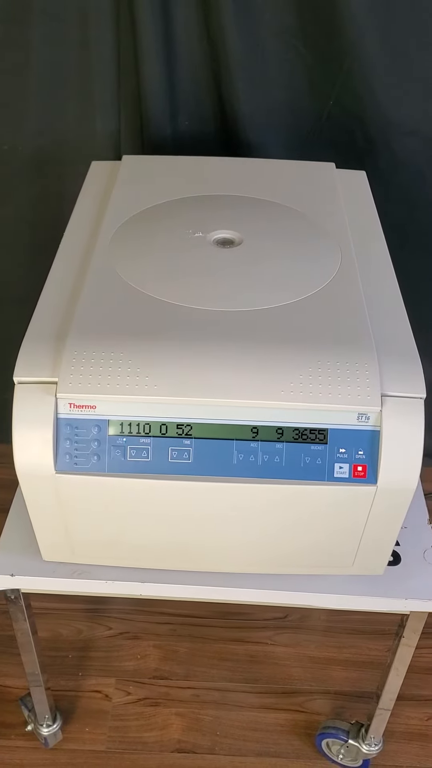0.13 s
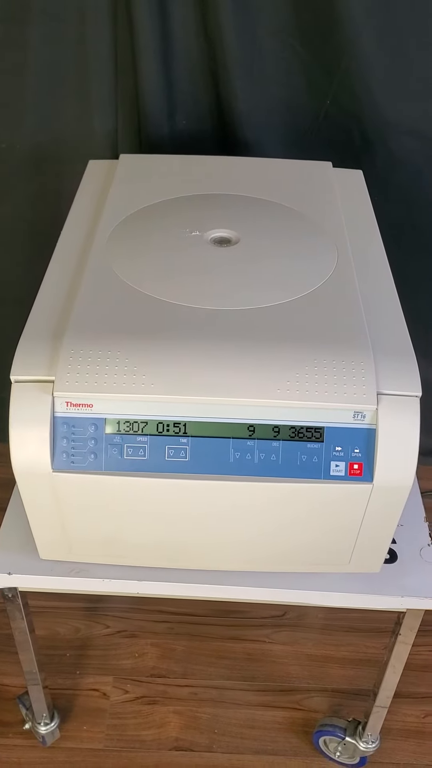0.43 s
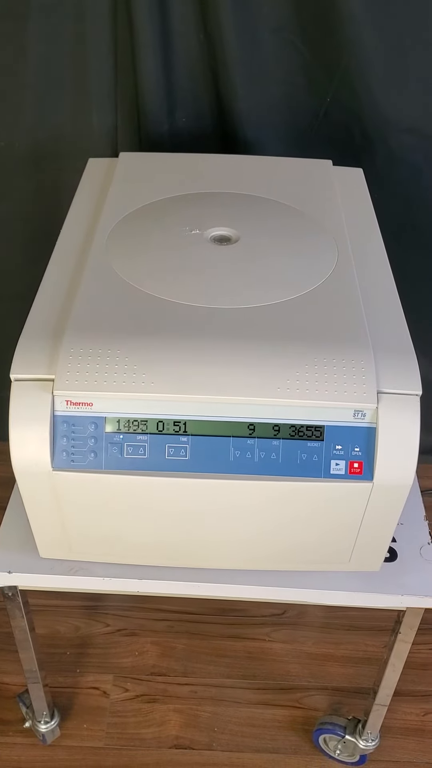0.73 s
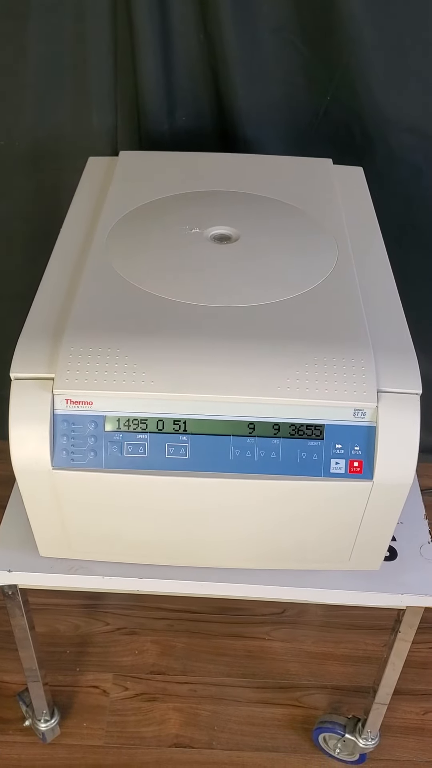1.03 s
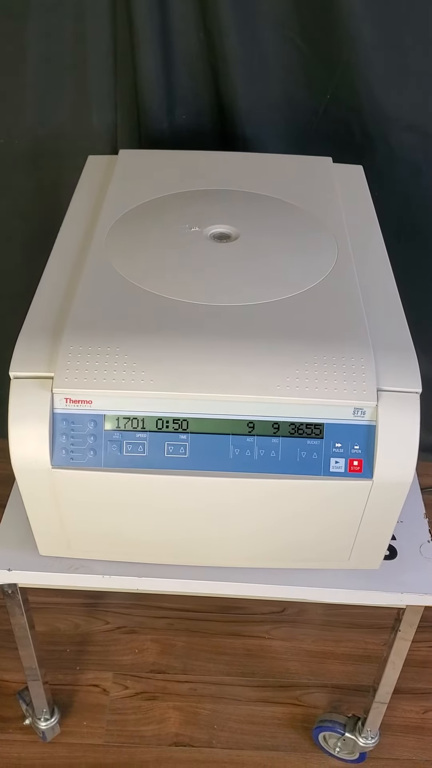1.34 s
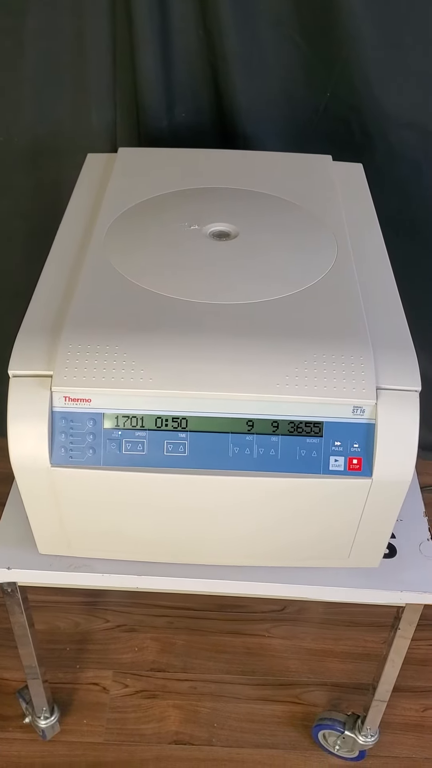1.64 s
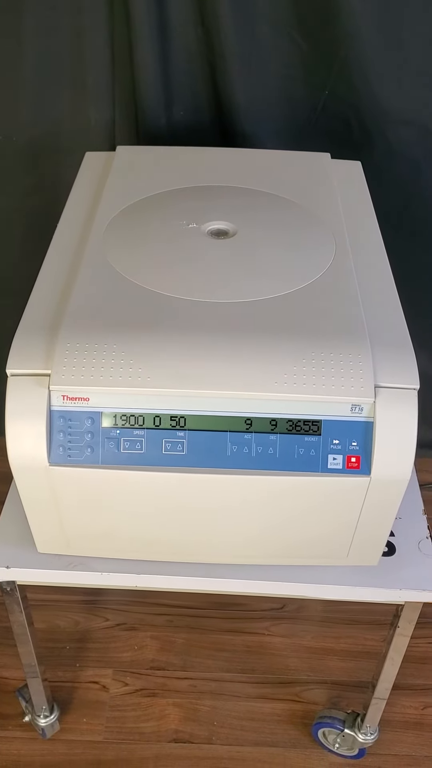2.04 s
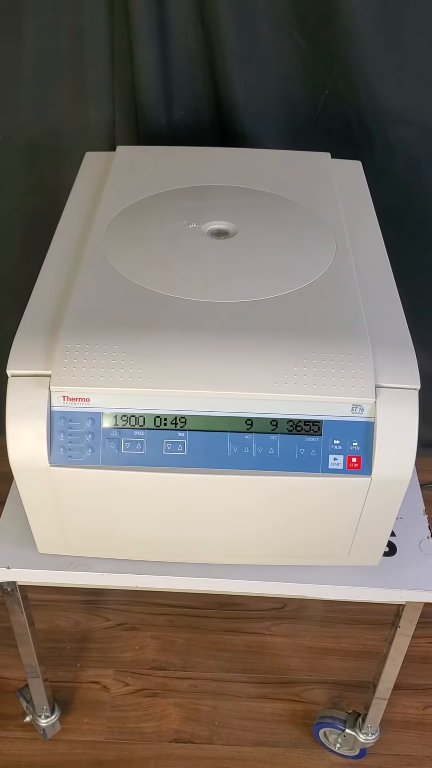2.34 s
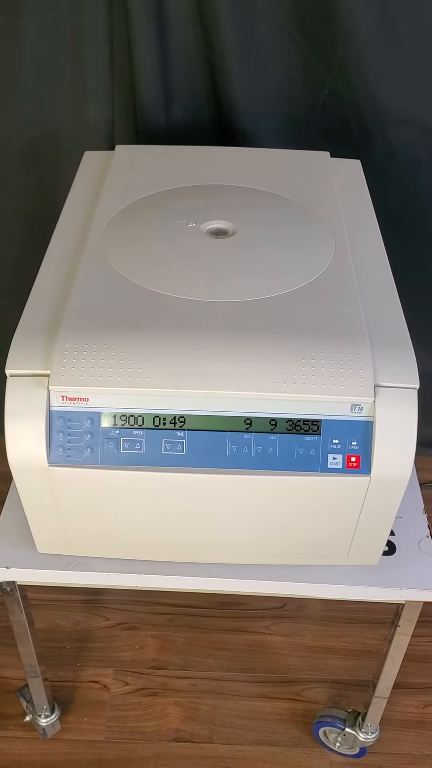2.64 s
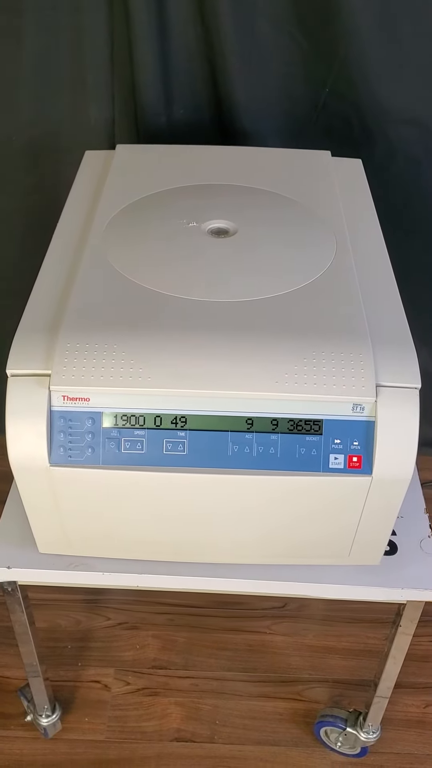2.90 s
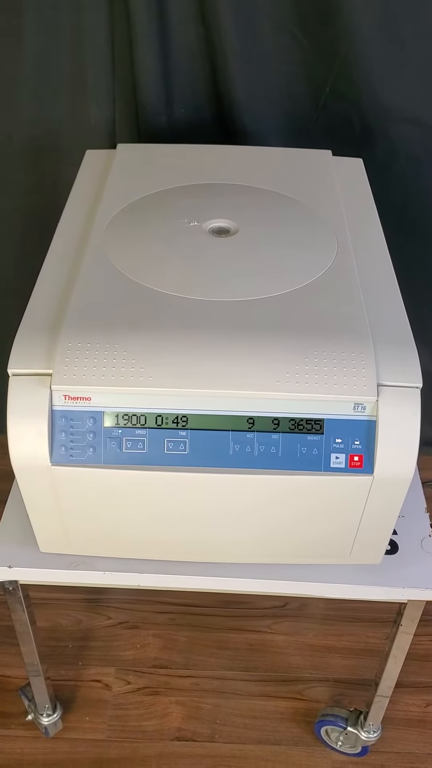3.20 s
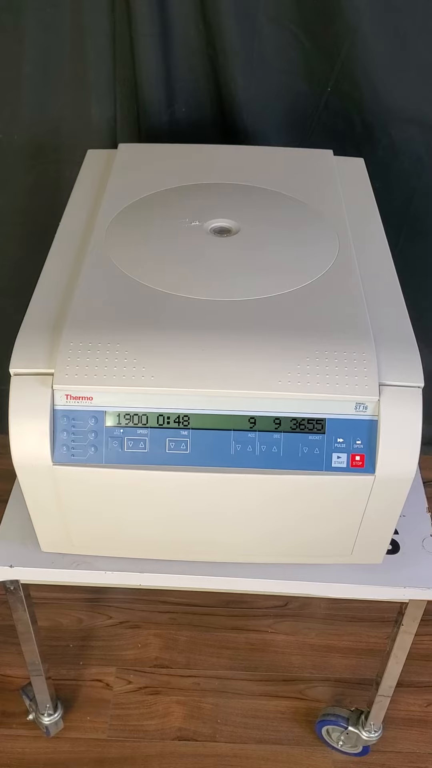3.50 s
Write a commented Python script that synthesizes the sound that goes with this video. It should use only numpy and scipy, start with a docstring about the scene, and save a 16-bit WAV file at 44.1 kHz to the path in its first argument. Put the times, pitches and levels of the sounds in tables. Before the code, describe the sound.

A bench centrifuge spins up in a quiet room, its hum and thin high whine rising smoothly, then sagging slightly; airflow and soft hiss surround it, with faint ticks late. Close stereo pickup, weaker and duller on the left.

```python
"""A bench centrifuge spins up in a quiet room: the hum climbs for 2.4 s, then eases back a little.
From the start, hum, octave and many thin whine orders glide through the fixed casing resonances,
over shaped noise for rumble, airflow, hiss and casing rattle. From 2.1 s, three soft ticks of treble
noise follow, each fainter. Two unlike channels: the left is weaker, nearly empty above 5.5 kHz,
with a faint steady hiss."""
import sys
import numpy as np
from scipy import signal
from scipy.io import wavfile
from scipy.ndimage import uniform_filter1d, map_coordinates

SR = 44100
rng = np.random.default_rng(int(sys.argv[2]) if len(sys.argv) > 2 else 0)


def generate_wav(signal):
    """Clip the signal to [-1, 1] and save it as 16-bit WAV at the path in sys.argv[1]."""
    frames = np.transpose(np.atleast_2d(signal))
    scaled = np.clip(frames, -1, 1) * 32767
    pcm = np.round(scaled).astype(np.int16)
    wavfile.write(sys.argv[1], SR, pcm)


def voltage_ratio(level):
    """Linear amplitude factor for a level in decibels (scalar or array-like)."""
    return 10 ** (np.asarray(level, float) / 20)


N = 161406

# Motor speed. Each row: time in seconds, hum pitch in Hz.
SPEED_HZ = [(0.0, 174.05), (0.203, 179.46), (0.407, 184.74), (0.61, 189.94), (0.813, 195.0),
            (1.017, 200.07), (1.22, 205.03), (1.423, 209.87), (1.627, 214.53), (1.83, 218.24),
            (2.033, 220.97), (2.237, 222.42), (2.44, 222.7), (2.643, 222.06), (2.847, 220.72),
            (3.05, 219.19), (3.253, 217.75), (3.457, 216.49), (3.66, 215.26)]
# Passage of hum and octave through casing and room. Each row: frequency in Hz, right channel rms in dB,
# left minus right in dB.
HUM_PATH_DB = [(175, -48, -6), (185, -34.5, -6), (189.5, -32, -7), (193, -35, -8), (201, -54, -5),
               (204.5, -42, -3), (209, -37, -3), (213.5, -38, -5), (216, -33, -8), (222, -28.5, -8.5),
               (350, -58, -10), (362, -48.5, -9), (372, -62, -10), (381, -46, -17), (398, -48, -13),
               (408, -43, -32), (414, -42, -11), (418.5, -45, -12), (424, -39, -9), (432, -40.5, -12),
               (441, -36, -9), (445.5, -38.5, -9)]
# Whine orders of the turning parts. Each row: multiple of the hum pitch, strength in dB before the casing.
WHINE_ORDERS_DB = [(8.14, -3), (8.33, 1), (9.365, -1), (11.325, -10), (12.355, -10), (12.65, -34),
                   (12.87, -20), (13.38, -17), (13.57, -24), (13.9, -21), (14.41, -20), (14.545, -31),
                   (14.64, -16), (14.93, -28), (15.35, -32), (15.445, -15), (15.54, -33), (15.865, -27),
                   (15.965, -26), (16.475, -12), (16.995, -19), (17.085, -22), (17.24, -26), (17.51, -16),
                   (18.205, -23), (18.43, -20), (18.63, -29), (19.425, -20), (19.625, -25), (19.66, -25),
                   (19.98, -28), (20.495, -17), (20.69, -27), (21.525, -28), (21.725, -28), (21.865, -24),
                   (22.055, -31), (22.24, -32), (22.365, -36), (22.56, -34), (22.67, -32), (22.75, -28),
                   (23.075, -31), (23.265, -32), (23.58, -30), (23.77, -31), (23.885, -36), (24.285, -32),
                   (24.6, -31), (24.795, -28), (25.11, -37), (25.52, -35), (25.66, -38), (25.83, -30),
                   (26.655, -26), (26.74, -32), (26.865, -34), (27.17, -33), (27.69, -35), (27.895, -32),
                   (28.75, -30)]
# Whine level as the load on the motor shifts. Each row: time in seconds, change in dB.
WHINE_LOAD_DB = [(0.0, -0.5), (0.5, 1.6), (1.0, 2), (1.5, 0.9), (2.0, -1), (2.5, 1), (3.0, 3), (3.66, 0)]
# Casing resonances. Each row: centre in Hz, width in Hz, peak gain in dB.
CASING_MODES = [(1692, 112, -62.7), (1980, 115, -65.6), (2550, 169, -46.7), (2709, 23, -44.6),
                (2811, 56, -28.5), (3046, 92, -39.0), (3142, 151, -37.1), (3447, 699, -61.1),
                (4139, 50, -44.2), (4232, 178, -43.6), (4426, 40, -44.8), (4585, 78, -46.9),
                (4780, 58, -37.7), (4926, 68, -29.0), (5026, 71, -36.5), (5191, 77, -47.4)]
# Left channel against right. Each row: frequency in Hz, gain in dB, phase lead in radians, likeness 0 to 1.
LEFT_CHANNEL = [(60, -8.5, 0, .99), (200, -7.5, 0, .97), (330, -8, 0, .88), (770, -7, -.1, .75),
                (1200, -8, -.3, .4), (1800, -7, -2.4, .35), (2800, -13, -1.9, .6), (4200, -13.5, -2, .3),
                (5100, -14, -1.5, .3), (5500, -36, 0, 0), (15000, -32, 0, 0)]
# Room rumble spectrum. Each row: frequency in Hz, relative density in dB per Hz.
RUMBLE_SHAPE_DB = [(20, -40), (30, -24), (42, -14.5), (55, -1), (70, -9.5), (85, 1), (100, -3.5),
                   (112, -16), (130, -21), (200, -16.5), (400, -45), (1500, -110)]
# Room rumble level. Each row: time in seconds, right channel level in dB.
RUMBLE_LEVEL_DB = [(0, -41.5), (.5, -46), (.7, -39), (2, -41), (3.3, -40.5), (3.66, -39)]
# Rotor airflow spectrum. Each row: frequency in Hz, relative density in dB per Hz.
AIR_SHAPE_DB = [(60, -10), (100, -1.5), (120, 3), (135, -2), (150, 9.5), (165, 1.5), (240, 0.5), (300, -3),
                (390, -6), (535, -6), (600, -9), (670, -4.5), (750, -4), (830, -10.5), (960, -5.5),
                (1100, -12), (1500, -10), (1850, -15), (3000, -15), (3800, -19.5), (4700, -23), (5500, -37),
                (9000, -93)]
# Rotor airflow level. Each row: time in seconds, right channel level in dB.
AIR_LEVEL_DB = [(0.0, -47), (0.61, -42.5), (0.77, -44), (2.08, -39.5), (3.54, -41), (3.66, -42)]
# Treble hiss spectrum. Each row: frequency in Hz, relative density in dB per Hz.
HISS_SHAPE_DB = [(4000, -5), (5300, 2.5), (7100, 2), (7230, 6), (7330, 2.5), (8000, -2.5), (8330, 0),
                 (8430, 6), (8550, -0.5), (9500, -1.5), (9900, 0), (11200, 2.5), (12500, -0.5),
                 (14300, -9.5), (15600, -22)]
# Treble hiss level. Each row: time in seconds, right channel level in dB before flicker.
HISS_LEVEL_DB = [(0, -68), (.3, -65.5), (.65, -64), (.78, -60), (1.1, -62.5), (1.5, -59.5), (2, -57),
                 (2.17, -59.5), (2.3, -58.5), (2.5, -57), (2.8, -59), (3.3, -60), (3.66, -59.5)]
# Soft ticks. Each row: start in seconds, peak level in dB, decay time constant in seconds.
TICK_EVENTS = [(2.122, -47.5, 0.028), (3.005, -55, .025), (3.58, -61, .015)]
# Tick spectrum. Each row: frequency in Hz, relative density in dB per Hz.
TICK_SHAPE_DB = [(3000, -14), (5500, -4), (7100, 0), (8000, -7), (10100, 0), (13500, -1), (15800, -22)]


def read(table, hz, axis=1):
    """One column of a table, interpolated over log frequency."""
    rows = np.array(table, float)
    return np.interp(np.log(hz + 1), np.log(rows[:, 0] + 1), rows[:, axis])


def curve(table, t_s):
    """A time table, interpolated linearly."""
    return np.interp(t_s, *np.transpose(table))


def evened(x):
    """Scales to rms 1."""
    return x / np.sqrt(np.mean(x ** 2) + 1e-20)


def drift(rate_hz):
    """Smooth random wander of rms 1, from 2 * rate_hz knots per second."""
    knots = rng.standard_normal(400)
    return evened(map_coordinates(knots, [np.arange(N) / SR * 2 * rate_hz], order=3))


def casing_gain(hz):
    """Fixed gain of the casing: steep resonances added in power."""
    power = 0
    for centre_hz, width_hz, db in CASING_MODES:
        offset = 2 * (hz - centre_hz) / width_hz
        power = power + (voltage_ratio(db) / (1 + offset ** 2 / 3) ** 1.5) ** 2
    return np.sqrt(power)


def stereo_noise(shape, level_db, patchy_db, size=1024):
    """Random short-time spectra, partly shared by the channels; the right one's level follows level_db."""
    frames, hz = 4 * N // size + 5, np.fft.rfftfreq(size, 1 / SR)
    a, b, c, d, patches = rng.standard_normal((frames, len(hz), 5)).T
    patches = uniform_filter1d(patches, size=20, axis=0)  # over frequency
    patches = evened(uniform_filter1d(patches, size=10, axis=1))  # over time
    likeness = np.clip(read(LEFT_CHANNEL, hz, axis=3), 0, 1)[:, None]
    lead = np.exp(1j * read(LEFT_CHANNEL, hz, axis=2))[:, None]
    right = a + 1j * b
    left = likeness * right * lead + np.sqrt(1 - likeness ** 2) * (c + 1j * d)
    left = left * voltage_ratio(read(LEFT_CHANNEL, hz))[:, None]
    spectra = np.array([left, right]) * shape(hz)[:, None] * voltage_ratio(patchy_db * patches)
    x = signal.istft(spectra, nperseg=size, noverlap=3 * size // 4)[1][:, :N]
    return x / np.sqrt(np.mean(x[1] ** 2)) * voltage_ratio(level_db)


def motor_hum(hum_hz, turn):
    """Hum and octave, locked to the motor speed, each weighted by its path at the pitch of the moment."""
    out = np.zeros((2, N))
    for k in (1, 2):
        level_db = read(HUM_PATH_DB, k * hum_hz) + 0.37 * drift(rate_hz=8.0)
        right = np.sqrt(2) * voltage_ratio(level_db) * np.sin(k * turn)
        out += right * [voltage_ratio(read(HUM_PATH_DB, k * hum_hz, axis=2)), np.ones(N)]
    return out


def motor_whine(hum_hz, turn):
    """High orders locked to the motor speed, swelling as they cross the fixed casing resonances."""
    waver_db, waver_hz = 1.2, 5.2
    load_db = curve(WHINE_LOAD_DB, np.arange(N) / SR)
    grid_hz = np.arange(0.0, 7000)
    left_gain, left_lead = voltage_ratio(read(LEFT_CHANNEL, grid_hz)), read(LEFT_CHANNEL, grid_hz, axis=2)
    responses = casing_gain(grid_hz), left_gain, left_lead
    out = np.zeros((2, N))
    for k, db in WHINE_ORDERS_DB:
        angle = k * turn + 2 * np.pi * rng.random()
        strength = np.sqrt(2) * voltage_ratio(db + load_db + waver_db * drift(waver_hz))
        gain, weaker, lead_rad = (np.interp(k * hum_hz, grid_hz, r) for r in responses)
        out += strength * gain * [weaker * np.sin(angle + lead_rad), np.sin(angle)]
    return out


def motor():
    """Hum and whine driven by one turning phase, the running sum of the smoothed speed."""
    hum_hz = uniform_filter1d(curve(SPEED_HZ, np.arange(N) / SR), size=6000)
    turn = 2 * np.pi * np.cumsum(hum_hz) / SR
    return motor_hum(hum_hz, turn) + motor_whine(hum_hz, turn)


def room_rumble():
    """Low room noise with a slowly changing level."""
    level_db = curve(RUMBLE_LEVEL_DB, np.arange(N) / SR)
    return stereo_noise(lambda hz: voltage_ratio(read(RUMBLE_SHAPE_DB, hz)), level_db, patchy_db=-0.7, size=8192)


def rotor_airflow():
    """Airflow around the rotor: broad noise, mostly low and middle, with a changing level."""
    level_db = curve(AIR_LEVEL_DB, np.arange(N) / SR)
    return stereo_noise(lambda hz: voltage_ratio(read(AIR_SHAPE_DB, hz)), level_db, patchy_db=-0.38, size=8192)


def treble_hiss():
    """Treble noise whose level follows a curve and flickers at random."""
    level_db = curve(HISS_LEVEL_DB, np.arange(N) / SR) + 0.46 * drift(rate_hz=8.8)
    return stereo_noise(lambda hz: voltage_ratio(read(HISS_SHAPE_DB, hz)), level_db, patchy_db=0.5)


def casing_rattle():
    """Broadband shake, falling towards the treble, that rings the casing resonances."""
    fall = 2.2  # exponent
    return stereo_noise(lambda hz: casing_gain(hz) / (hz + 1000) ** fall, -54, patchy_db=2.0, size=4096)


def left_hiss():
    """Faint steady band of noise in the left channel alone."""
    level_db, band_hz = -90, (7700, 15200)
    band = signal.butter(4, band_hz, "bandpass", fs=SR, output="sos")
    left = voltage_ratio(level_db) * evened(signal.sosfilt(band, rng.standard_normal(N)))
    return np.array([left, np.zeros(N)])


def ticks():
    """Short soft puffs of treble noise: linear rise, exponential decay."""
    rise_s = 0.0077
    t_s, envelope = np.arange(N) / SR, np.zeros(N)
    for start_s, db, decay_s in TICK_EVENTS:
        age_s = np.maximum(t_s - start_s, 0)
        rise = np.minimum(age_s / rise_s, 1)
        envelope += voltage_ratio(db) * rise * np.exp(-np.maximum(age_s - rise_s, 0) / decay_s)
    return envelope * stereo_noise(lambda hz: voltage_ratio(read(TICK_SHAPE_DB, hz)), 0, patchy_db=1.2)


def scene():
    """All sources in both channels, left first."""
    return motor() + room_rumble() + rotor_airflow() + treble_hiss() + casing_rattle() + ticks()


def low_pass(x):
    """Removes everything above the highest recorded frequency."""
    return signal.sosfilt(signal.butter(12, 15720, fs=SR, output="sos"), x)


def record(dry):
    """Adds the left channel's faint hiss and finishes the mix."""
    mix = dry + left_hiss()
    return low_pass(mix)


dry = scene()
out = record(dry)
generate_wav(out)
```